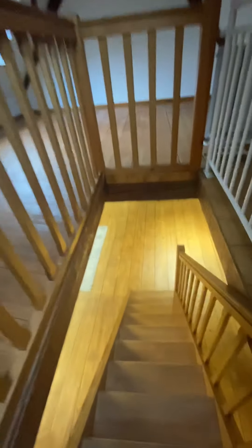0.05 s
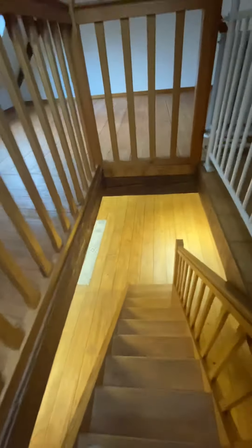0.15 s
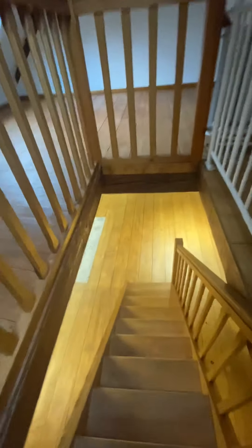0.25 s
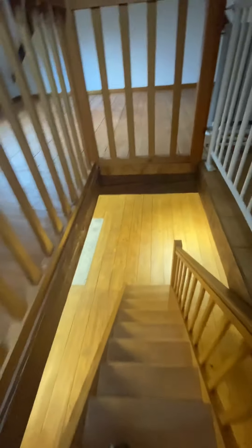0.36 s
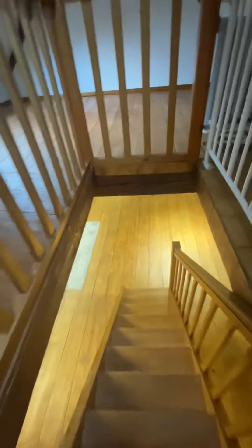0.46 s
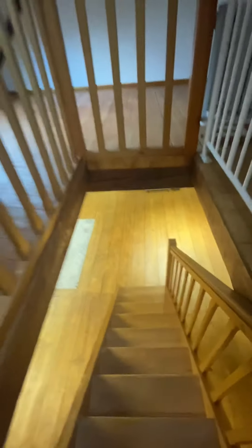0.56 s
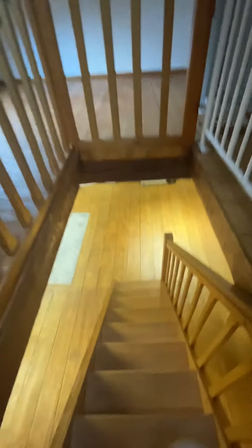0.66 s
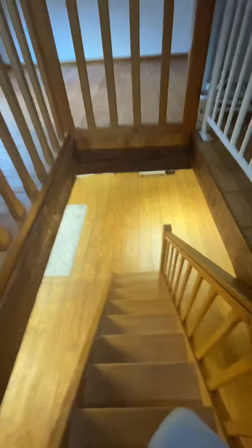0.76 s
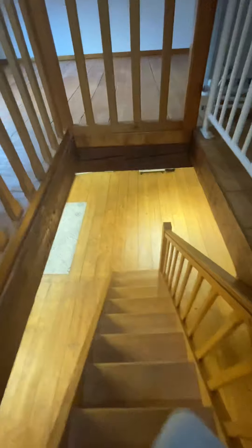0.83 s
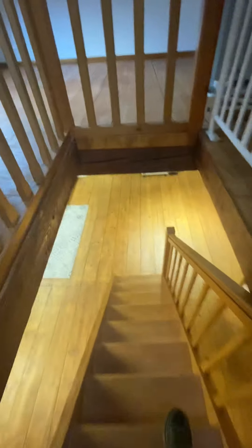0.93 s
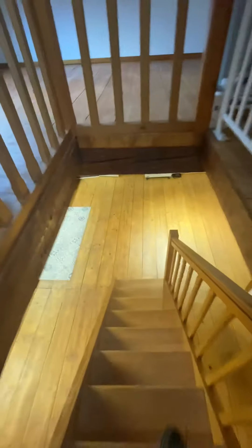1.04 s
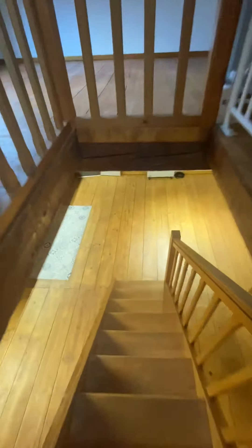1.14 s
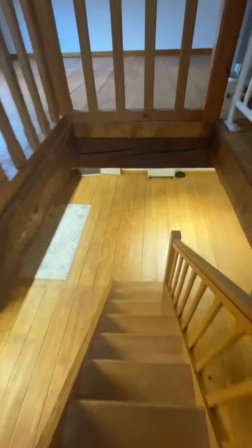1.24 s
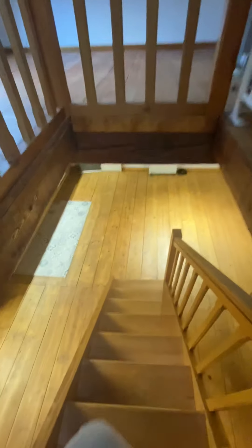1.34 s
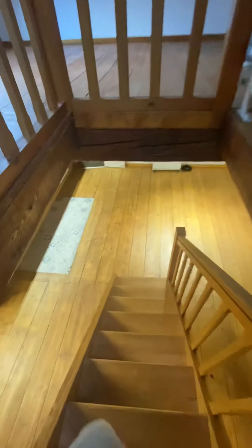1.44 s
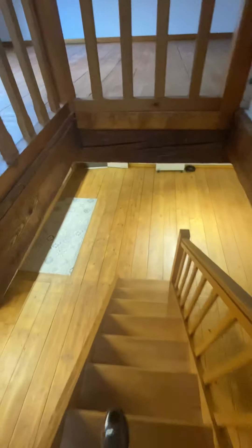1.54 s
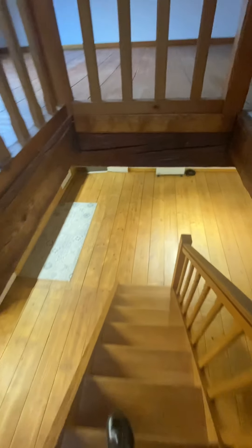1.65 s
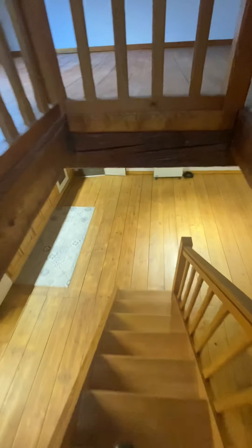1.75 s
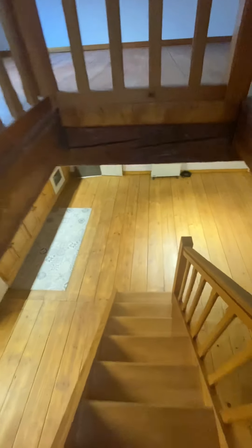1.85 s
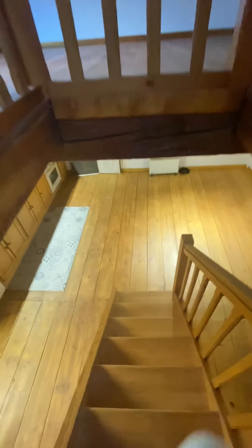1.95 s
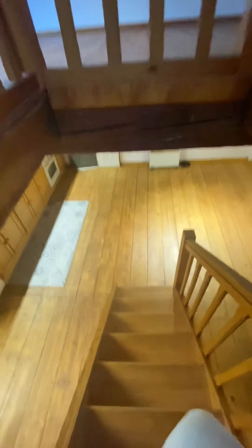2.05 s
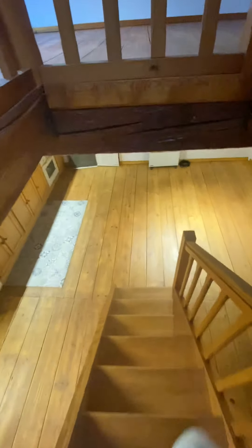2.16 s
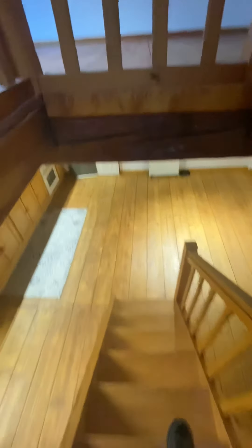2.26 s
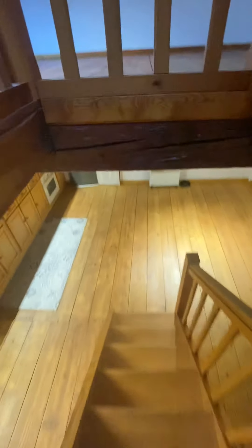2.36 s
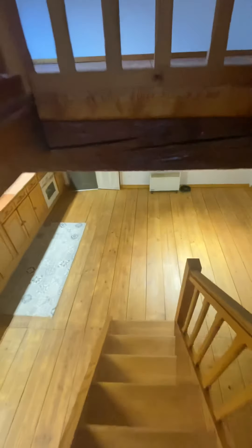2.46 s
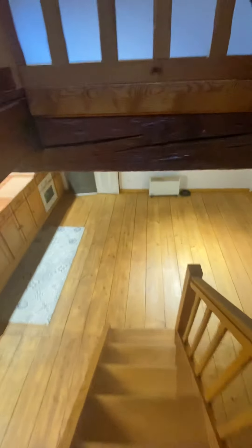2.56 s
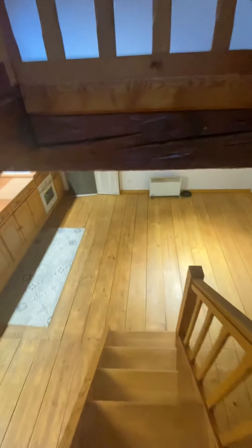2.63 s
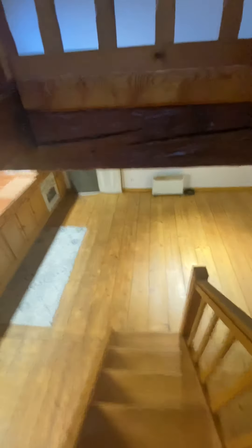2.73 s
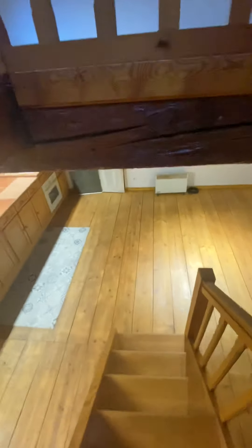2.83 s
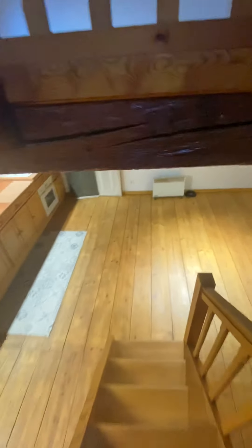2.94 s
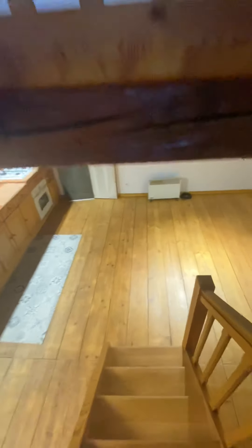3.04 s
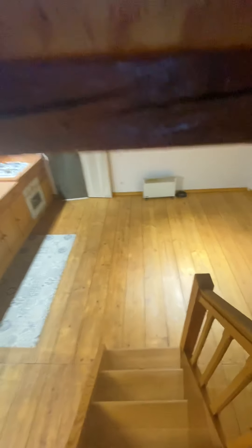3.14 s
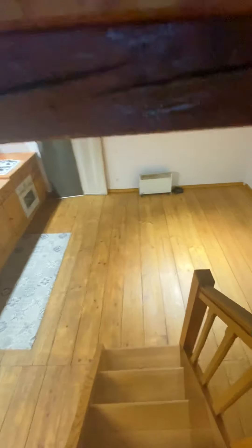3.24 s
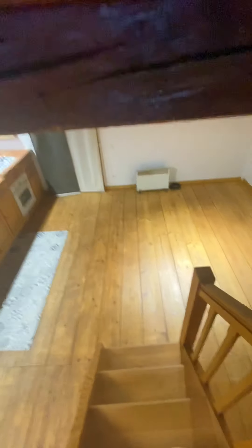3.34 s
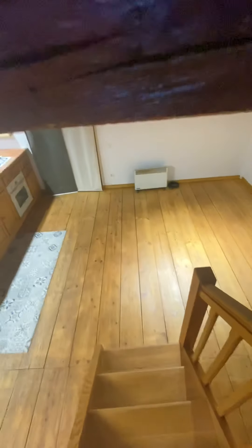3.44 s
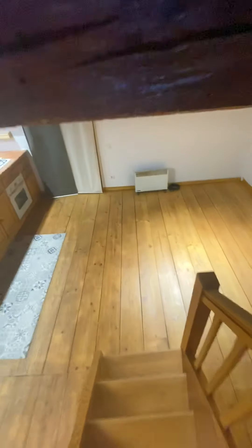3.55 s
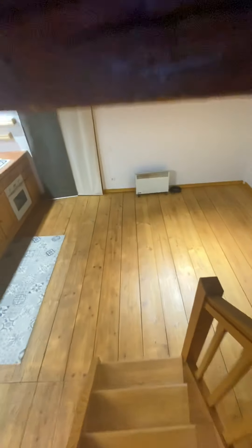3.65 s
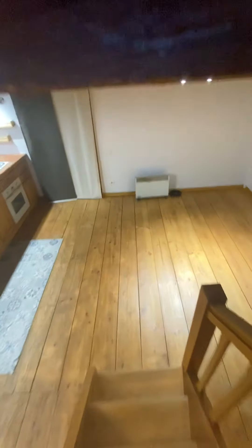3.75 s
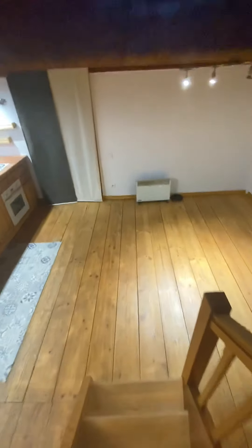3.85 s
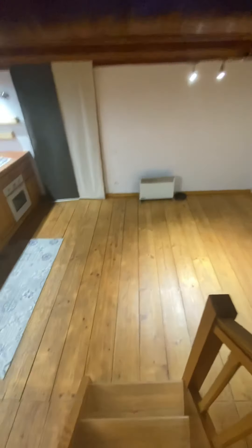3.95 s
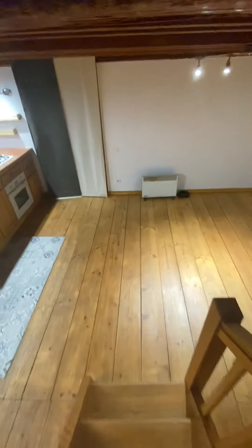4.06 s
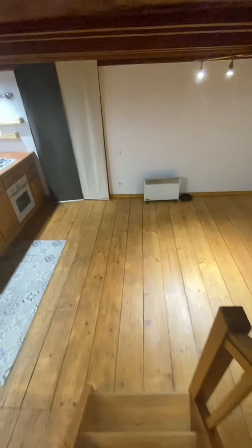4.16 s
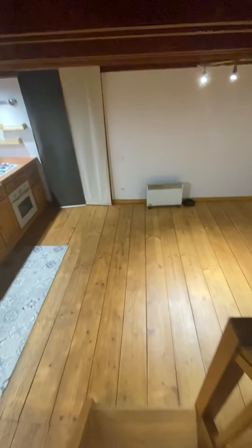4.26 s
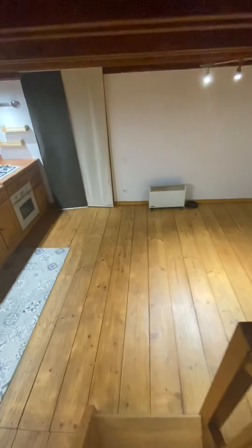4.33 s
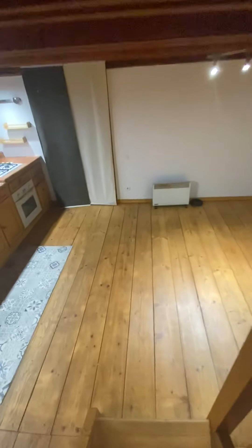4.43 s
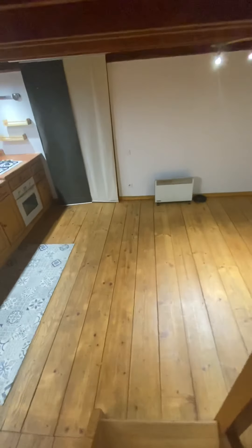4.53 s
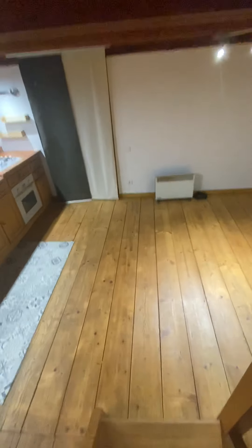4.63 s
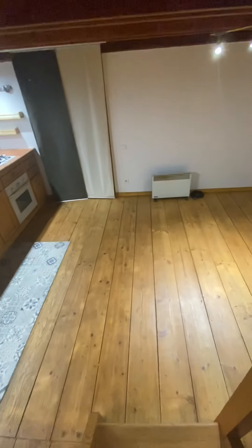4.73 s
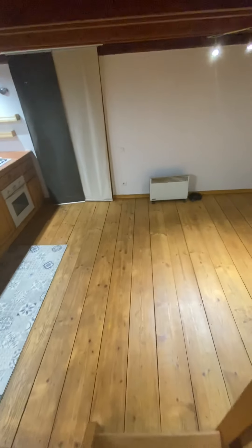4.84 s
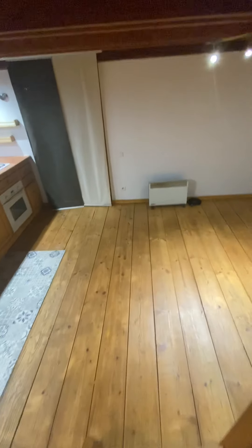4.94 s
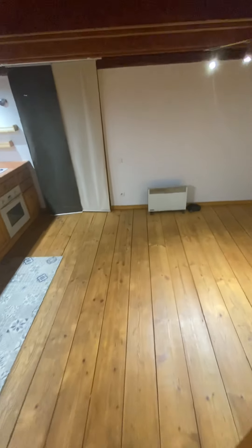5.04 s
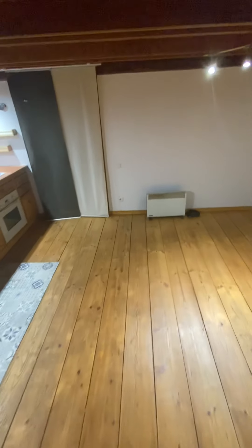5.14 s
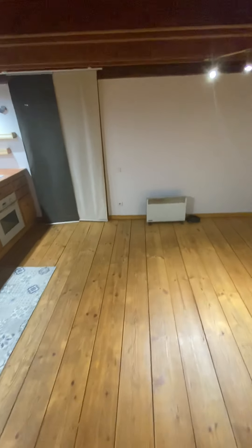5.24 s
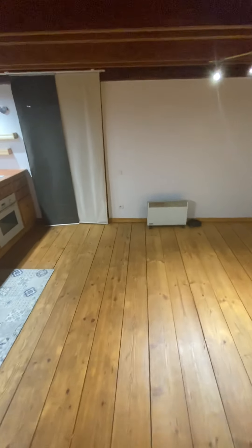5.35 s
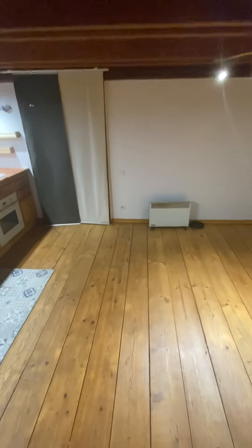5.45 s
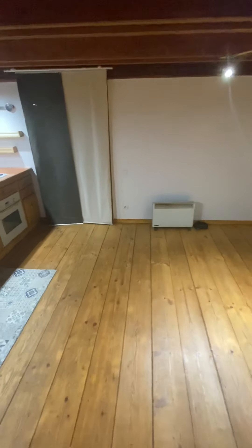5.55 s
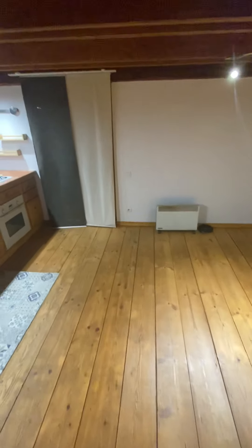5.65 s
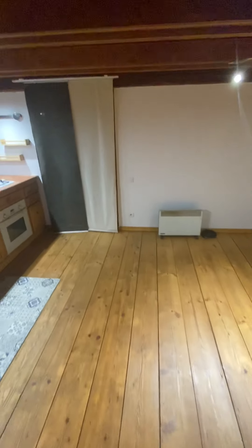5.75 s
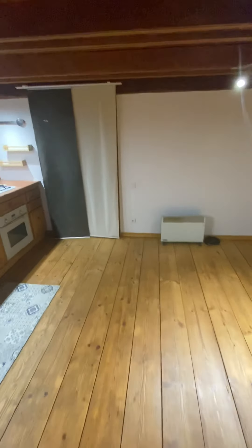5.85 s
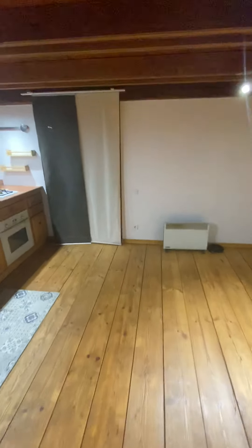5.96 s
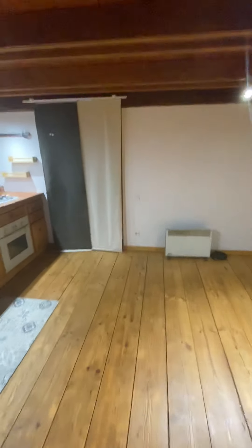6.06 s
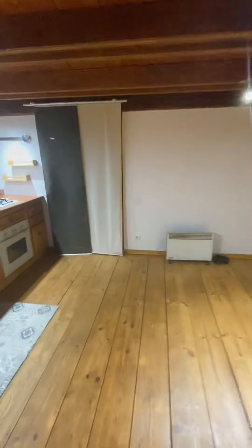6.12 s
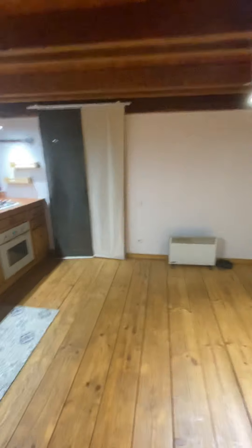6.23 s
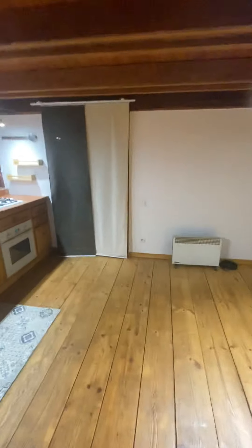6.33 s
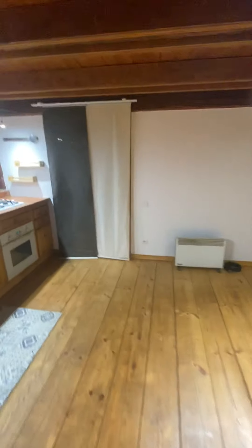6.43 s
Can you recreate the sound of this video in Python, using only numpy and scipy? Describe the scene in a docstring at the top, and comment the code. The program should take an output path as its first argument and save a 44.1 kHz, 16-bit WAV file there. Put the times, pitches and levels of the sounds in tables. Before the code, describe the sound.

Close, handheld perspective from the walker: dull wooden footfalls boom from below, first on hollow stair treads, then on plank flooring. Heels land with cushioned thumps, followed by gentler sole contacts, tiny joint ticks, dry toe taps and brief dull scuffs. Fabric rubs softly after each stride. The house is nearly silent between steps, and the empty room adds a light reverberant tail. Nobody speaks.

```python
"""Someone in soft shoes walks down a wooden staircase and steps out onto the floorboards of a large, bare room.
Each heel and roll of the sole sets the board's own pitches booming; shaped noise is the stair frame and room.
Short noise bursts through resonances make the ticks, taps and toe knocks; swells of noise make the scuffs.
Clothes rustle close to the microphone with every stride, as grainy noise over a quiet house murmur."""
import sys
import numpy as np
from scipy import signal
from scipy.io import wavfile
from scipy.ndimage import uniform_filter1d

SR = 44100
rng = np.random.default_rng(int(sys.argv[2]) if len(sys.argv) > 2 else 0)


def to_wav(s):
    """Save 16-bit WAV."""
    ch = np.atleast_2d(s).T  # columns
    pcm = np.round(np.clip(ch, -1, 1) * 32767)  # PCM
    wavfile.write(sys.argv[1], SR, pcm.astype(np.int16))


N = 286209
TIME = np.arange(N) / SR   # seconds
AGE = np.arange(SR) / SR   # seconds since a blow; a struck sound lasts at most one second

# ring of the stair frame and room: (pitch [Hz], colour [dB], wood t60 [s], room t60 [s], room level [dB],
# left-right likeness [0-1])
HOUSE = [(38, -17, 0.19, 1.2, 3.5, 1), (76, -17, 0.084, 1.56, 2.5, 0.85), (140, -0.5, 0.27, 0.61, -1, 1),
         (261, -4.5, 0.048, 0.71, -5.5, 0.89), (686, -5, 0.16, 1.053, -8.5, 0),
         (1280, -4.5, 0.053, 0.91, -4.5, 0.06), (2420, -1.5, 0.039, 0.86, -3.5, 0.28),
         (3600, -5.5, 0.14, 1.9, -12, 0.66), (11500, -10, 0.026, 0.13, -7, 0.29)]
# one row per stride, at the heel's landing: (time [s], weight [dB], hardness [dB], heel push [dB],
# heel tick [dB], heel tap [dB], board t60 [s], bass lag [s], push pitch [Hz], direct knock [dB],
# frame shake [dB], rustle [dB], rustle length [s])
STEPS = [(0.002, -33, 7, -2, -36, -13, 0.84, 0.00094, 247, -7, 1.5, -61, 0.12),
         (0.474, -28, -4.5, -1.5, -50, 13.5, 0.2, 0.002, 278, 1.5, 2.5, -62.5, 0.34),
         (1.092, -27, 7, -2, -38, 0, 0.23, 0.0018, 405, -9, -1.5, -64, 0.55),
         (1.775, -22.5, 14, 5.5, -35.5, 1, 0.5, 0.00835, 278, -8, -4.5, -58, 0.2),
         (2.418, -34.5, 1, -5, -42, 11, 0.26, 0.0019, 295, 2.5, 5, -66.5, 0.11),
         (3.079, -25.5, 3.5, 4, -48, 5, 0.36, 0.0049, 277, -7.5, -2, -66, 0.74),
         (3.7, -23, 0.5, 2, -38, 0, 0.27, 0.0089, 224, 3.5, -3.5, -57.5, 0.32),
         (4.369, -20.5, 12, 4, -37, -6, 0.45, 0.0052, 130, -19, -7, -57, 0.28),
         (5.128, -28, 16.5, 5, -62, 0, 0.43, 0.0048, 200, 5.5, -1.5, -58, 0.39),
         (5.907, -26.5, -5, -2, -66, -2, 0.38, 0.0032, 252, -3.5, -3, -69.5, 0.59)]


def from_db(db):
    """Decibels to gain."""
    return 10 ** (np.asarray(db) / 20)


def rms_one(x):
    """Scale to unit power."""
    return x / np.sqrt(np.mean(x ** 2) + 1e-20)


def at_hz(rows, hz):
    """Read every column of a table at one frequency."""
    points, *columns = np.transpose(rows)
    return [np.interp(np.log(hz), np.log(points), c) for c in columns]


def fade(t60):
    """Exponential decay from the moment of a blow; t60 is the time to drop by 60 dB."""
    return np.exp(-np.log(1000) * AGE / t60)


def add(out, s, sound):
    """Mix a sound in at time s."""
    start = max(round(s * SR), 0)
    out[:, start:start + sound.shape[-1]] += sound[..., :N - start]


def band_pass(order, low_hz, high_hz, x):
    """Keep only the sound between two pitches."""
    return signal.sosfilt(signal.butter(order, [low_hz, high_hz], "band", fs=SR, output="sos"), x)


def resonance(x, hz, width_hz):
    """A peak with steep skirts: the same peak filter, width_hz wide, applied twice."""
    peak = signal.iirpeak(hz, hz / width_hz, fs=SR)
    return signal.lfilter(*peak, signal.lfilter(*peak, x))


def flutter(size, span):
    """Smooth chance of unit spread that changes about once per span of seconds."""
    width = int(span * SR) + 1
    slow = rng.standard_normal(size)
    for _ in range(2):
        slow = uniform_filter1d(slow, width, mode="wrap")
    return rms_one(slow)


def noise_bands():
    """Roughly third-octave bands of stereo noise of unit power, as alike left and right as HOUSE says."""
    edges_hz = 28 * 2 ** (np.arange(28) / 2.95)
    # one extra second lets the filters settle; neighbouring bands use different noise
    white = rng.standard_normal((2, 2, N + SR))
    for k, (low, high) in enumerate(zip(edges_hz, edges_hz[1:])):
        mid, side = band_pass(2, low, high, white[k % 2])[:, SR:]
        hz = np.sqrt(low * high)
        alike = np.clip(at_hz(HOUSE, hz)[-1], 0, 1)
        yield hz, rms_one(np.sqrt(1 + alike) * mid + np.sqrt(1 - alike) * side * [[1], [-1]])


def contacts():
    """Every landing and roll as (time [s], weight [dB], hardness [dB]), in order of time."""
    # further contacts on the same tread, as the sole comes down and the weight rolls over it: # (time [s],
    # weight [dB], hardness [dB])
    rolls = [(0.285, -47, -1), (0.508, -30.5, -6), (0.555, -32, -9.5), (0.6, -38.5, -1.5),
             (1.124, -23.5, -16), (1.168, -42, 9.5), (1.229, -39, 0), (1.663, -47, 1), (1.799, -23.5, -10),
             (1.86, -31.5, -2), (1.952, -34.5, 5.5), (2.444, -31, -10), (2.554, -33.5, -0.5),
             (2.75, -53.5, -12), (3.114, -29, -8), (3.211, -33, 7.5), (3.237, -42, 4), (3.735, -26, -14),
             (3.78, -35.5, -36), (3.875, -46, -10), (3.939, -43, -23), (4.172, -42.5, 0.5),
             (4.426, -33.5, 5), (5.335, -38, -9), (5.972, -31.5, -12), (6.158, -46, -29)]
    return sorted([tuple(step[:3]) for step in STEPS] + [tuple(roll) for roll in rolls])


def stride_contacts(k):
    """The heel of stride k and the rolls that follow it before the next heel."""
    heels = [step[0] for step in STEPS] + [np.inf]
    return [row for row in contacts() if heels[k] <= row[0] < heels[k + 1]]


def stride_at(s):
    """The stride under way at time s."""
    return [step for step in STEPS if step[0] <= s][-1]


def shake_db(s):
    """How much the stride under way at time s shakes the frame."""
    return stride_at(s)[10]


def bass_lag(s, hz):
    """Bending waves in wood travel slower the lower they are, so the boom follows the tick."""
    full_lag_hz = 100   # the pitch that lags by a stride's full bass lag
    return abs(stride_at(s)[7]) * np.sqrt(full_lag_hz / hz)


def blow_db(weight_db, hardness_db, hz):
    """How strongly a contact drives one frequency: weight lifts every pitch, hardness mostly the higher ones."""
    # how a contact drives the wood: (pitch [Hz], level re weight [dB], share of its hardness added [0-1])
    blow = [(143, -1.5, 0.096), (310, 1.5, 0.56), (590, -2.5, 0.73), (1740, -17, 0.53), (2920, -16.5, 0.37)]
    slope_db, share = at_hz(blow, hz)
    return weight_db + slope_db + share * hardness_db


def stride_swell():
    """Clothes rub hardest just after each landing and calm down between strides."""
    lag_s = 0.064   # the swell peaks this long after the landing
    rise_db, fall_db = 7, 14   # its drop one rustle length before and after the peak
    power = 0
    for s, *_, rustle_db, length in STEPS:
        away = (TIME - s - lag_s) / length
        drop_db = np.maximum(-rise_db * away, fall_db * away)
        power = power + from_db(rustle_db - drop_db) ** 2
    return np.sqrt(power)


def clothes_and_air(cloth_db, grain_db):
    """Fabric rubs in tiny catches with each stride, over the low murmur of the house."""
    # colour of the rustle: (pitch [Hz], relative level per Hz [dB])
    cloth_colour = [(400, 5), (1000, -6), (2400, -1.5), (3400, -2), (4200, -2.5), (5300, 2.5), (7000, -10),
                    (9000, -4), (11500, -11), (13500, -22.5), (15500, 0)]
    # colour of the quiet house: (pitch [Hz], relative level per Hz [dB])
    air_colour = [(25, 19), (45, -19), (100, 10.5), (170, -10), (450, -18), (900, -22), (2200, -18.5),
                  (5000, -34.5), (15000, -47)]
    air_db = -59
    cloth, air = 0, 0
    for hz, band in noise_bands():
        cloth = cloth + from_db(at_hz(cloth_colour, hz)[0]) * np.sqrt(hz) * band
        air = air + from_db(at_hz(air_colour, hz)[0]) * np.sqrt(hz) * band[:, ::-1]
    catches = from_db(grain_db * rms_one(uniform_filter1d(rng.standard_normal(N), size=200)))
    rustle = from_db(cloth_db) * stride_swell() * rms_one(cloth * catches)
    return rustle + from_db(air_db) * rms_one(air)


def frame_and_room(level_db, rise_cycles, cushion_s, even_cycles):
    """Each contact shakes the crowded modes of the woodwork, which die fast and leave the room ringing."""
    rattle_db, rattle_s = 1.8, 0.009   # the shaking is uneven: depth and grain length
    out = np.zeros((2, N))
    for hz, band in noise_bands():
        colour_db, wood_t60, room_t60, room_db, _ = at_hz(HOUSE, hz)
        # the energy of a blow is shared evenly among neighbouring modes
        power = uniform_filter1d(np.mean(band ** 2, axis=0), int(even_cycles * SR / hz) + 1)
        # the soft sole spreads the blow, and low modes take longer to build up
        swell = 1 - np.exp(-AGE / (cushion_s + rise_cycles / hz))
        shape = swell ** 2 * (fade(wood_t60) ** 2 + (from_db(room_db) * fade(room_t60)) ** 2)
        energy = np.zeros((1, N))
        for s, weight_db, hardness_db in contacts():
            drive_db = shake_db(s) + blow_db(weight_db, hardness_db, hz)
            add(energy, s + bass_lag(s, hz), from_db(drive_db) ** 2 * shape)
        out += from_db(level_db + colour_db) * np.sqrt(energy / (power + 1e-9)) * band
    return out * from_db(rattle_db * flutter(N, rattle_s))


def treads(level_db, build_cycles, build_s, room_db, room_t60, ear_spread):
    """The board rings in its own modes; each roll of the sole tops it up, and the room carries it on."""
    # each landing place has its own modes; one line per stride, seven treads and then three spots of floor:
    # (pitch [Hz], level re the heel's weight [dB])
    board_modes = [
        [(102, -2.5), (218, -7), (290, -12.5), (456, -17.5), (726, -21), (844, -32)],
        [(134, 1), (255, -10), (345, -6.5), (405, -8.5), (515, -14.5), (565, -14.5), (654, -19.5), (1229, -30)],
        [(145, 5), (285, -7), (393, -6), (428, -6.5), (575, -14), (612, -3), (788, -16.5), (1206, -24),
         (2680, -22)],
        [(122, -7.5), (154, -5.5), (219, -12), (378, -6.5), (430, -10), (580, -10.5), (655, -16), (720, -17),
         (1214, -27)],
        [(122, 0.5), (155, 4), (215, -4), (360, -10.5), (483, -7), (635, -9), (780, -18), (1172, -21)],
        [(124, 0.5), (158, -0.5), (222, -6), (392, -26), (445, -10.5), (530, -12), (582, -17), (849, -15.5),
         (1230, -25), (1600, -24.5), (1950, -28), (2400, -29)],
        [(96, -15), (127, 2), (166, -5.5), (280, -15.5), (420, -8), (465, -14), (510, -16.5), (640, -13.5),
         (937, -19.5), (1030, -26.5), (1420, -36), (2440, -23), (2620, -30), (2780, -32)],
        [(127, -15), (200, -10), (272, -12), (355, -12.5), (443, -8), (593, -15), (661, -14), (768, -16),
         (860, -18), (1053, -18.5), (1185, -20.5), (1550, -23), (1760, -28), (1920, -26), (2300, -24),
         (2720, -16), (2790, -18)],
        [(107, -5), (150, -8.5), (221, -9.5), (272, -12.5), (552, -2), (582, -2.5), (655, -5.5), (730, -5),
         (772, -3), (860, -11), (960, -29), (1048, -11), (1130, -23), (1192, -12), (1350, -26), (1551, -30),
         (1730, -35), (1950, -37), (2440, -31)],
        [(100, -6.5), (126, 1.5), (222, -9), (270, -21), (335, -23), (395, -11.5), (432, -8), (470, -11.5),
         (550, -28), (641, -22), (760, -30), (902, -23), (1200, -31.5), (1500, -31)],
    ]
    twin_db, twin_share = -8, 0.0352   # weaker twin of each mode: level, distance as a share of the pitch
    knock_t60 = 0.08   # seconds; the direct knock before the board settles into ringing
    # each mode wavers in level and phase as the foot rolls and reflections arrive
    waver_db, waver_rad, waver_s = 2.5, 0.6, 0.022
    high_waver_rad = 1.6   # extra phase waver that blurs the highest modes
    damped_above_hz, damping_power = 1200, 1.3   # above this pitch the modes die ever sooner
    out = np.zeros((2, N))
    for k, modes in enumerate(board_modes):
        heel_s, heel_db, heel_hardness_db, _, _, _, t60, _, _, knock_db, *_ = STEPS[k]
        for hz, mode_db in modes:
            life = min(1, damped_above_hz / hz) ** damping_power
            board = fade(t60 * life)
            room = from_db(room_db) * life * fade(room_t60)
            knock = from_db(knock_db) * fade(knock_t60 * life)
            decay = np.sqrt(board ** 2 + room ** 2 + knock ** 2)
            shape = decay * (1 - np.exp(-AGE / (build_s + build_cycles / hz)))
            power = 0
            for s, weight_db, hardness_db in stride_contacts(k):
                drive_db = blow_db(weight_db, hardness_db, hz) - blow_db(heel_db, heel_hardness_db, hz)
                power = power + np.interp(AGE + heel_s - s, AGE, from_db(drive_db) * shape, left=0) ** 2
            start, twin_start, detune, apart, twin_apart = rng.standard_normal(5)
            # the less alike left and right are at this pitch, the further apart their phases
            ears = ear_spread * np.array([[1], [-1]]) * (1 - at_hz(HOUSE, hz)[-1])
            phase_waver = (waver_rad + high_waver_rad * (1 - life)) * flutter(len(AGE), waver_s * life)
            phase = 2 * np.pi * hz * AGE + phase_waver
            twin_phase = phase * (1 + twin_share * np.sign(detune))
            twin = np.sin(twin_phase + np.pi * twin_start + ears * twin_apart)
            ring = np.sin(phase + np.pi * start + ears * apart) + from_db(twin_db) * twin
            gain = from_db(level_db + heel_db + mode_db + waver_db * flutter(len(AGE), waver_s))
            add(out, heel_s + bass_lag(heel_s, hz), gain * np.sqrt(power) * ring)
    return out


def soles(level_db, push_cycles):
    """The cushioned impact itself: one short, heavily damped push of air."""
    out = np.zeros((2, N))
    for s, _, _, push_db, _, _, _, _, hz, *_ in STEPS:
        push = np.sin(2 * np.pi * hz * AGE) * fade(push_cycles / hz) * AGE * hz
        add(out, s + bass_lag(s, hz), from_db(push_db + level_db) * push)
    return out


def heel_ticks():
    """Each landing makes the wood tick: (time [s], ring [dB], bright crack [dB], pitch [Hz])."""
    crack_re_ring_db, note_hz = -18, 2650
    return [(s, tick_db, tick_db + crack_re_ring_db, note_hz) for s, _, _, _, tick_db, *_ in STEPS]


def ticks(ring_db, crack_db, crack_t60, ring_room_db, crack_room_db, room_t60):
    """A joint slips: a brief bright crack rings its small modes and its own note, with a faint room tail."""
    # wood joints tick under the shifting weight: (time [s], ring [dB], bright crack [dB], pitch [Hz])
    joint_slips = [(0.670, -47, -75, 2950), (1.061, -52, -70, 3400), (1.176, -30, -35, 2800),
                   (2.166, -48, -70, 2850), (2.421, -41, -60, 5500), (2.508, -28, -37, 4950),
                   (2.509, -22.5, -55, 3200), (2.528, -32.5, -66, 3080), (2.542, -32.5, -66, 3080),
                   (3.116, -38, -70, 2250), (3.215, -40, -70, 1600), (4.015, -56, -54, 5100),
                   (4.171, -42, -70, 2300), (4.375, -28, -70, 2700), (5.123, -47, -75, 2600),
                   (5.156, -39, -70, 2000), (5.175, -42, -70, 2400), (6.274, -51, -56, 3300),
                   (6.427, -55, -80, 1700)]
    # what every tick rings with: (pitch [Hz], width [Hz], level [dB])
    joint_modes = [(2350, 500, -6), (2750, 450, -3), (3400, 350, -7), (5060, 600, -9)]
    note_width_hz, note_db = 900, 3
    out = np.zeros((2, N))
    for s, joint_db, bright_db, note_hz in heel_ticks() + list(joint_slips):
        noise = rng.standard_normal((2, 2, len(AGE)))
        # each side borrows half of the other's noise, so the crack is partly shared
        crack = (noise[0] + noise[0, ::-1] / 2) * fade(crack_t60)
        tail = noise[1] * fade(room_t60)
        drive = crack + from_db(ring_room_db) * tail
        modes = [*joint_modes, (note_hz, note_width_hz, note_db)]
        ring = sum(from_db(db) * resonance(drive, hz, width) for hz, width, db in modes)
        bright = band_pass(4, 6500, 12500, crack + from_db(crack_room_db) * tail)
        add(out, s, from_db(joint_db + ring_db) * ring + from_db(bright_db + crack_db) * bright)
    return out


def heel_taps(level_db, low_hz, high_hz, t60, roll_db):
    """The firm edge of the shoe meets the wood in a short, grainy tap at every landing and roll."""
    tap_hz = 1750   # the pitch at which the strength of the contact is read
    out = np.zeros((2, N))
    for k, (heel_s, _, _, _, _, heel_db, *_) in enumerate(STEPS):
        for s, weight_db, hardness_db in stride_contacts(k):
            tap_db = blow_db(weight_db, hardness_db, tap_hz) + (heel_db if s == heel_s else roll_db)
            grains = rng.laplace(size=(2, len(AGE))) * fade(t60)
            add(out, s, from_db(tap_db + level_db) * band_pass(4, low_hz, high_hz, grains + 1e-18))
    return out


def toe_knocks():
    """A light, dry knock: a short burst in one broad wood resonance, with a faint room tail."""
    # the toe or the edge of the sole knocks lightly on the wood: (time [s], level [dB], pitch [Hz])
    knocks = [(0.286, -34, 700), (1.662, -35, 600), (1.955, -27, 450), (2.557, -20, 650), (2.752, -38, 560),
              (3.216, -27, 700), (3.237, -28, 850), (3.815, -28, 520), (3.877, -28, 480), (4.171, -29, 520),
              (4.183, -34, 680), (6.165, -40, 430)]
    wood_t60, room_db, room_t60 = 0.06, -16, 0.4   # seconds, dB, seconds
    width_share = 0.8   # width of the resonance as a share of its pitch
    out = np.zeros((2, N))
    shape = np.hypot(fade(wood_t60), from_db(room_db) * fade(room_t60))
    for s, db, hz in knocks:
        grains = rng.standard_normal((2, len(AGE)))
        burst = (grains + grains.mean(axis=0)) * shape
        add(out, s, from_db(db) * resonance(burst, hz, hz * width_share))
    return out


def scuffs(low_hz, high_hz):
    """A soft sole rubs the wood in a short, dull swell with a little hiss on top."""
    # the sole brushes the wood as it turns or leaves its tread:
    # (time of the peak [s], dull rub [dB], hiss before its trim [dB], time from peak to about a third [s])
    brushes = [(0.364, -57, -79, 0.093), (1.732, -54, -84, 0.15), (3.24, -55, -62, 0.031),
               (3.893, -49.5, -57, 0.058), (4.195, -55.5, -64, 0.016), (5.79, -63, -90, 0.16),
               (6.06, -71, -58.5, 0.16)]
    hiss_low_hz, hiss_high_hz, hiss_trim_db = 1540, 3370, -2.5
    rub = band_pass(3, low_hz, high_hz, rng.standard_normal((2, N)))
    rub = rms_one(rub + rub.mean(axis=0))
    hiss = band_pass(2, hiss_low_hz, hiss_high_hz, rng.laplace(size=(2, N)))
    hiss = from_db(hiss_trim_db) * rms_one(hiss)
    out = np.zeros((2, N))
    for s, rub_db, hiss_db, length in brushes:
        swell = np.exp(-((TIME - s) / length) ** 2)
        out += (from_db(rub_db) * rub + from_db(hiss_db) * hiss) * swell
    return out


def scene():
    """All sounds come from below and reach the left microphone port slightly later."""
    port_lag_s = 0.00018
    sound = clothes_and_air(cloth_db=3.5, grain_db=1.0)
    sound += frame_and_room(level_db=-8.5, rise_cycles=1.0, cushion_s=0.0071, even_cycles=9.3)
    sound += treads(level_db=0.5, build_cycles=0.8, build_s=0.002, room_db=-12, room_t60=0.75, ear_spread=0.8)
    sound += soles(level_db=-5.5, push_cycles=1.8)
    sound += ticks(ring_db=5, crack_db=-2, crack_t60=0.013, ring_room_db=-22, crack_room_db=-32, room_t60=0.4)
    sound += heel_taps(level_db=-2.0, low_hz=985, high_hz=2710, t60=0.049, roll_db=6.5)
    sound += toe_knocks()
    sound += scuffs(low_hz=141, high_hz=600)
    left, right = sound
    return np.array([np.interp(TIME - port_lag_s, TIME, left), right])


def record(dry):
    """The microphone sheds the deepest bass and the top is cut."""
    cutoff_hz = 15900
    lean = signal.sosfilt(signal.butter(4, 46, "high", fs=SR, output="sos"), dry)
    return signal.sosfilt(signal.ellip(10, 0.2, 80, cutoff_hz, fs=SR, output="sos"), lean)


dry = scene()
out = record(dry)
to_wav(out)
```